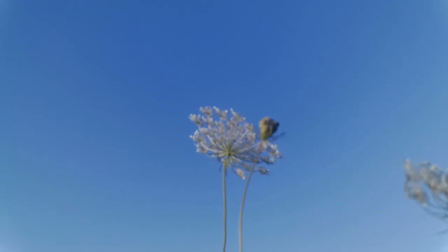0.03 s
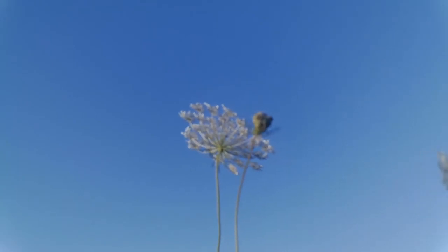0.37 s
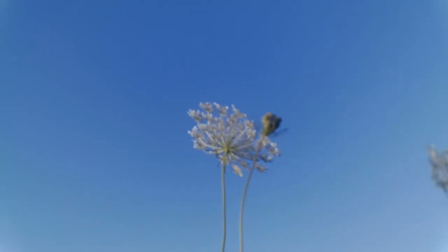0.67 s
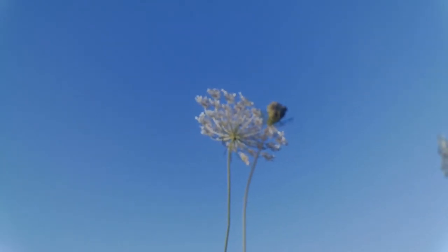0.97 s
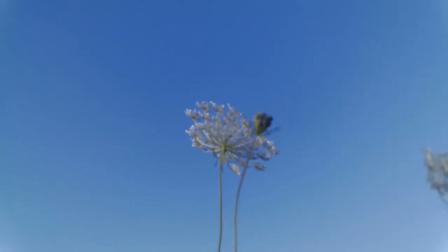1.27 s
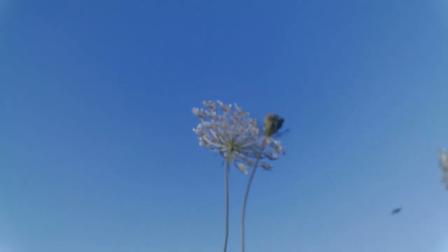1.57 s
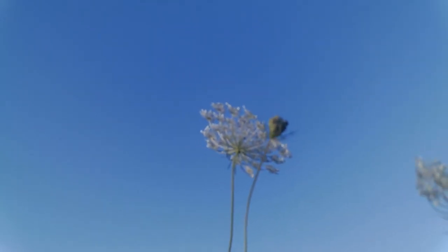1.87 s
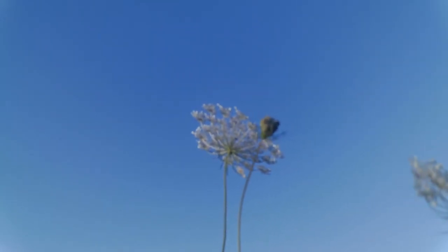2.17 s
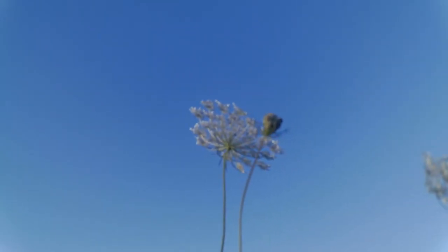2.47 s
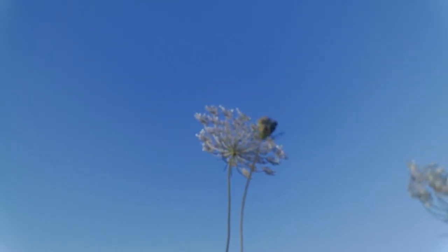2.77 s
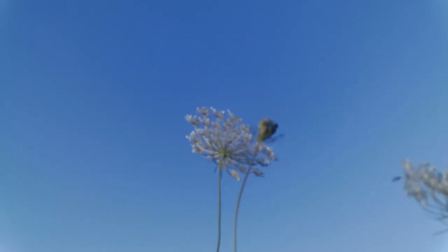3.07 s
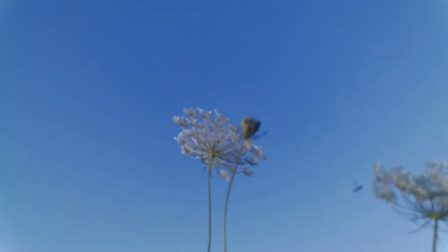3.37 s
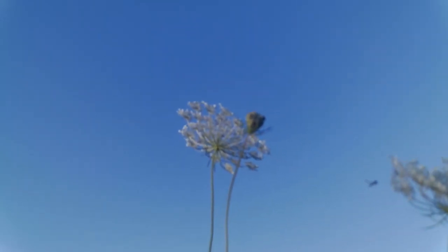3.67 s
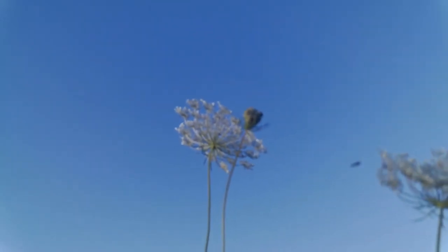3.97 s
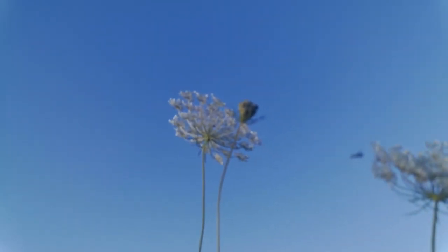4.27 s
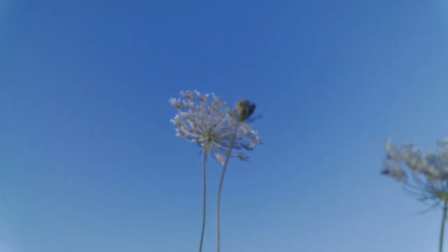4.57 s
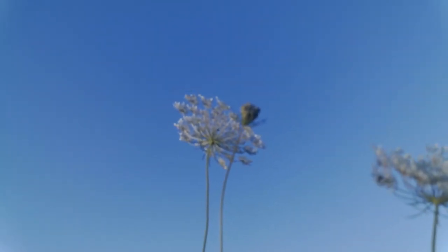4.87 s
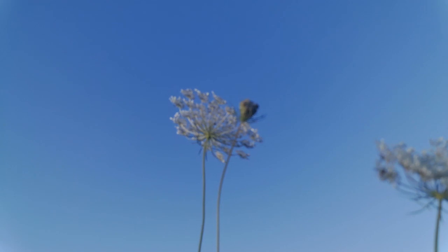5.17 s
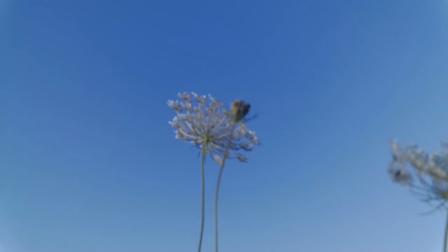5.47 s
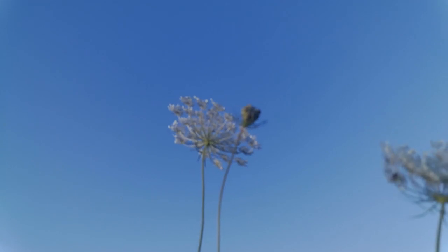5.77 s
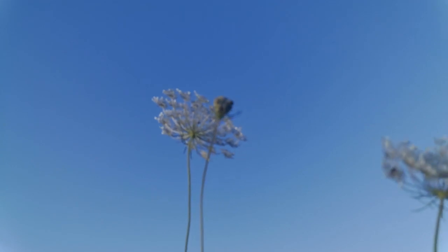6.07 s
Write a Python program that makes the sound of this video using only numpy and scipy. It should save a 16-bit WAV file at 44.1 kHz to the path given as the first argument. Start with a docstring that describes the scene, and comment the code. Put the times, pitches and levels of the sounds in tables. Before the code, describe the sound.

Crickets trill in a quiet meadow for about six seconds, heard on the left channel only. Three are close and two far off, before a faint shimmering chorus; each trill is very high, with about fifteen pulses a second. Two near crickets sing from the start, and a third swells in at around 1.9 seconds. The trilling thins briefly near 3.5 seconds, then the crickets return one after another between 3.8 and 5.4 seconds.

A dry stem ticks twice, at 0.3 and 0.7 seconds, the second tick louder. A small bird gives three runs of four quick, falling chirps, at about 1.5 to 1.9, 4.1 to 4.6 and 5.5 to 5.9 seconds, with one faint note at 2.8. Underneath, a soft, dark haze of wind continues evenly, along with the low, wavering drone of a distant engine that swells slightly near 1.2 seconds and again from 3 seconds.

```python
"""A sunny meadow, one microphone, on the left channel only. Three crickets trill close by and two far
off, before a faint chorus; each wing stroke drags a scraper over a file and makes a short gliding
whistle. A dry stem ticks twice, and a small bird gives three runs of falling chirps.
Under them lie a soft haze of wind and the drone of a distant engine."""
import sys
import numpy as np
from scipy import signal
from scipy.fft import rfft, irfft, next_fast_len
from scipy.io import wavfile

SR = 44100
rng = np.random.default_rng(int(sys.argv[2]) if len(sys.argv) > 2 else 0)


def generate_wav(sig):
    """Save sig (samples, or channels by samples) to the path in sys.argv[1] as 16-bit PCM at SR."""
    pcm = np.round(np.clip(np.atleast_2d(sig).T, -1, 1) * 32767).astype(np.int16)
    wavfile.write(sys.argv[1], SR, pcm)


N = 274109

# Spectrum of the wind over the field: frequency_hz, relative_db
WIND_SPECTRUM = [(15, -3), (30, 0.5), (75, 0), (125, -5), (250, -10.5), (500, -16), (780, -18.5),
                 (1000, -21.5), (2000, -26), (4000, -31), (6200, -36), (8300, -42), (10000, -46.5),
                 (11200, -55), (12500, -58)]
# Swell of the distant engine: time_s, level_db (all levels stand before the gains in scene)
ENGINE_SWELL = [(0, -61), (.7, -63), (1.15, -53), (1.6, -64), (2.4, -67), (2.9, -54.5), (4, -57),
                (6.2, -57)]
# Tones of its drone: pitch_hz, width_hz, relative_db
ENGINE_TONES = [(60.6, 4.25, 0.5), (97.54, 4.97, 2), (183, 5.5, -14)]
# Three shapes of one closing wing stroke: from_middle_ms, pitch_ratio, relative_db
ARCHED_STROKE = [(-10.3, .982, -16), (-8.3, .976, -1), (-5, .986, 2), (0, .998, -2), (3.5, .99, -2),
                 (7, .971, 4), (8.8, .955, 2), (10.3, .93, -16), (14.5, .88, -22)]
FALLING_STROKE = [(-14, 1, -16), (-11, 1.018, -7), (-7, 1.014, -1), (0, 1, 0), (6, .979, 2), (10, .95, -2),
                  (13, .928, -16)]
SHORT_STROKE = [(-10, .965, -14), (-6, .98, -3), (-2.5, .993, 1.5), (1, 1, .5), (5.5, .98, 0),
                (7.5, .935, -11), (10, .91, -9), (13, .89, -22)]
# Three near and two far crickets at 0 dB effort, by name: stroke, pitch_hz, level_db,
# rise_hz_per_db of effort, warm_up_s
CRICKETS = {"lead": (ARCHED_STROKE, 7852, -59.5, 31, .25), "low": (FALLING_STROKE, 6800, -62, 15, .22),
            "rival": (SHORT_STROKE, 7565, -58.5, 42, .5), "far low": (SHORT_STROKE, 6690, -72, 5, 0.594),
            "far high": (SHORT_STROKE, 8470, -74.5, 5, 0.87)}
# Bouts of trilling: cricket, start_s, end_s, strokes_per_s, speeding_per_s2,
# opening_effort_db, settled_effort_db
TRILL_BOUTS = [("lead", .022, 3.28, 16.108, -.091, 0, 0), ("lead", 3.757, 6.18, 15.67, .04, -3, .5),
               ("low", .061, 3.61, 13.8, 0, 0, 0), ("low", 5.348, 6.17, 15.24, -1.55, -8.5, 0),
               ("rival", 1.878, 4, 16.135, -.121, -14, 0), ("rival", 4.655, 6.14, 16.135, 0, -12, -12.5),
               ("far low", .05, 3.25, 14.69, 0, 0, -1.5), ("far low", 3.79, 6.21, 15.29, 0, 1, 1.5),
               ("far high", .005, .55, 18.1, -6, 0, 0), ("far high", 2.322, 3.38, 17.06, 0, -8, 0)]
# Ticks of a dry stem: start_s, level_db
STEM_TICKS = [(.288, -54), (.6755, -48)]
# The bird's notes: start_s, length_s, first_pitch_hz, last_pitch_hz, level_db
BIRD_CHIRPS = [(1.493, 0.036, 3700, 2750, -57.5), (1.601, 0.058, 5030, 3320, -54),
               (1.744, 0.039, 4600, 3280, -54.5), (1.871, .04, 4150, 3100, -60.5),
               (2.782, 0.072, 4530, 4250, -65), (4.131, 0.065, 4920, 3180, -54.5),
               (4.274, .039, 4400, 3340, -62), (4.39, 0.039, 4270, 3090, -55.5),
               (4.504, 0.05, 4400, 2980, -55), (5.468, .031, 3950, 3240, -63),
               (5.581, 0.07, 5160, 3320, -59), (5.706, .055, 5330, 3280, -59),
               (5.84, .054, 5120, 3330, -58.5)]


def amp(db):
    """Decibels to gain."""
    return 10 ** (np.asarray(db) / 20)


def unit(x):
    """Scales to rms 1."""
    return x / np.sqrt(np.mean(abs(x) ** 2) + 1e-20)


def wander(hz):
    """A smooth random curve of rms 1 that changes up to about hz times a second."""
    size = next_fast_len(N)
    f = np.fft.rfftfreq(size, 1 / SR)[:16384]
    spectrum = rng.standard_normal(len(f)) + 1j * rng.standard_normal(len(f))
    return unit(irfft(spectrum * np.exp(-.5 * (f / hz) ** 2), size)[:N])


def add(mix, start_s, sound):
    """Adds a sound into the mix at start_s."""
    part = mix[round(start_s * SR):][:len(sound)]
    part += sound[:len(part)]


def wind(level_db=-49.5, flutter_db=.13, gust_db=.53, gust_at_s=3.6, gust_width_s=1):
    """Air moving over the field: a dark, even hiss; one soft gust lifts it below 300 Hz."""
    f = np.fft.rfftfreq(N, 1 / SR)
    hz, db = np.transpose(WIND_SPECTRUM)
    colour = amp(np.interp(np.log(f + 1), np.log(hz), db))
    low_cut = f / np.hypot(f, 12)
    spectrum = rfft(rng.standard_normal(N)) * colour * low_cut
    air = irfft(spectrum, N)
    rumble = irfft(spectrum / (1 + (f / 300) ** 2), N)
    gust = amp(gust_db * np.exp(-((np.arange(N) / SR - gust_at_s) / gust_width_s) ** 2))
    return amp(level_db + flutter_db * wander(11)) * unit(air + (gust - 1) * rumble)


def distant_engine(fading_db=3):
    """Low tones from far away, wavering and fading on their path through the air."""
    drone = np.zeros(N)
    for hz, width_hz, db in ENGINE_TONES:
        cycles = np.cumsum(hz + width_hz / 2 * wander(2.8)) / SR
        drone += amp(db + fading_db * wander(4.9)) * np.sin(2 * np.pi * cycles)
    swell_db = np.interp(np.arange(N) / SR, *np.transpose(ENGINE_SWELL))
    return amp(swell_db) * drone


def distant_chorus(pitch_hz=7600, width_hz=600, level_db=-78.5):
    """Crickets too far off to tell apart merge into one faint, narrow shimmer."""
    phase = 2 * np.pi * pitch_hz * np.arange(N) / SR
    shimmer = wander(width_hz / 2) * np.cos(phase) + wander(width_hz / 2) * np.sin(phase)
    return amp(level_db) * unit(shimmer)


def trill(stroke, hz, db, rise_hz_per_db, warm_up_s, bout, slip=.003, grip_db=.85, vary_db=.74):
    """Each stroke drags scraper over file; the tooth rate is the pitch, which rises with effort."""
    start_s, end_s, strokes_per_s, speeding, opening_db, settled_db = bout
    length_s = end_s - start_s
    age_s = np.maximum(np.arange(N) / SR - start_s, -.5 / strokes_per_s)
    sung_s = np.clip(age_s, 0, length_s)
    strokes = strokes_per_s * age_s + speeding * sung_s ** 2 / 2
    last_stroke = np.round(np.interp(length_s, age_s, strokes))
    nearest_stroke = np.clip(np.round(strokes), 0, last_stroke)
    ms = 1000 * (strokes - nearest_stroke) / (strokes_per_s + speeding * sung_s)  # from mid-stroke
    effort_db = settled_db + (opening_db - settled_db) * np.exp(-np.maximum(age_s, 0) / warm_up_s)
    shape_ms, bend, force_db = np.transpose(stroke)
    glide_hz = (hz + rise_hz_per_db * effort_db) * np.interp(ms, shape_ms, bend)
    pitch_hz = glide_hz * (1 + slip * wander(500))  # the scraper slips a little
    stroke_db = db + effort_db + np.interp(ms, shape_ms, force_db)
    level_db = stroke_db + grip_db * wander(160) + vary_db * wander(30)
    touching = np.clip(ms - shape_ms[0], 0, 1) * np.clip(shape_ms[-1] - ms, 0, 1)  # wings open silently
    return amp(level_db) * touching * np.sin(2 * np.pi * np.cumsum(pitch_hz) / SR)


def cricket(name):
    """One cricket, near or far, trills through all its bouts."""
    return sum(trill(*CRICKETS[name], bout) for singer, *bout in TRILL_BOUTS if singer == name)


def grass_scatter(sound, t60_s=.39, scatter_db=-19):
    """Stalks and ground add a brief, faint tail on the way to the microphone."""
    t = np.arange(8192) / SR
    echoes = rng.standard_normal(len(t)) * amp(-60 * t / t60_s) * (t > .002)
    tail = signal.oaconvolve(sound, echoes / np.linalg.norm(echoes))[:N]
    return sound + amp(scatter_db) * tail


def dry_stem(t60_s=.012, band_hz=(2000, 8800)):
    """A dry stem snaps: each tick is a tiny burst with no ring."""
    out, t = np.zeros(N), np.arange(1024) / SR
    band = signal.butter(4, band_hz, "bandpass", fs=SR, output="sos")
    for start_s, db in STEM_TICKS:
        burst = rng.standard_normal(len(t)) * amp(db - 60 * t / t60_s)
        add(out, start_s, signal.sosfilt(band, burst))
    return out


def bird(waver=.0014, flutter_db=2, straight_s=.057, bow_per_s=4.4, echo_s=.002, echo_gain=.28):
    """Nearly pure whistles swell to an accent as they slide down; a ground echo ripples each glide."""
    out, drift, flutter = np.zeros(N), wander(120), wander(60)
    for start_s, length_s, first_hz, last_hz, db in BIRD_CHIRPS:
        progress = np.linspace(0, 1, round(length_s * SR))
        now = round(start_s * SR) + np.arange(len(progress))
        # notes longer than straight_s hang before they fall, shorter ones drop at once
        fallen = progress - bow_per_s * (length_s - straight_s) * np.sin(np.pi * progress)
        pitch_hz = (first_hz + (last_hz - first_hz) * fallen) * (1 + waver * drift[now])
        accent_db = np.interp(progress, [0, .41, 1], [-11, 0, -5])
        envelope = signal.windows.tukey(len(now), .2) * amp(db + accent_db + flutter_db * flutter[now])
        note = envelope * np.sin(2 * np.pi * np.cumsum(pitch_hz) / SR)
        add(out, start_s, note)
        add(out, start_s + echo_s, echo_gain * note)
    return out


def scene(microphone_db=6, crickets_db=1.8):
    """The singers in the grass, over wind and engine; the microphone feeds the left channel alone."""
    crickets = amp(crickets_db) * sum(grass_scatter(cricket(name)) for name in CRICKETS)
    chirps = grass_scatter(bird(), t60_s=.15, scatter_db=-15)
    meadow = crickets + chirps + dry_stem() + wind() + distant_engine() + distant_chorus()
    return np.array([amp(microphone_db) * meadow, np.zeros(N)])


def record(dry, band_limit_hz=12650):
    """A straight-line change of sample rate leaves a faint copy of the trills 3.9 kHz higher."""
    positions = np.arange(0, N + 8, 147 / 160)  # 44.1 kHz to 48 kHz
    upsampled = np.array([np.interp(positions, np.arange(N), channel) for channel in dry])
    restored = signal.resample_poly(upsampled, 147, 160, axis=1)[:, :N]
    low_pass = signal.firwin(511, band_limit_hz, window=("kaiser", 9), fs=SR)
    return signal.oaconvolve(restored, low_pass[None], "same")


dry = scene()
out = record(dry)
generate_wav(out)
```